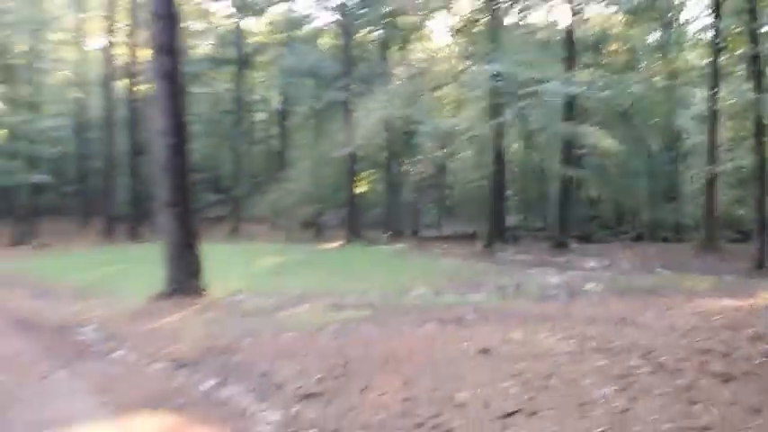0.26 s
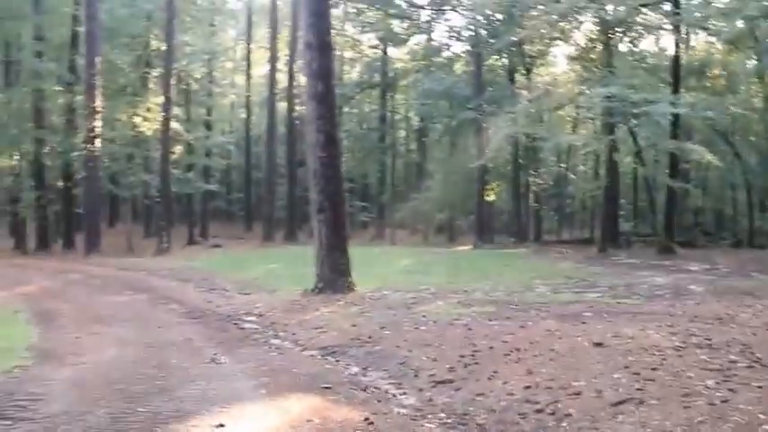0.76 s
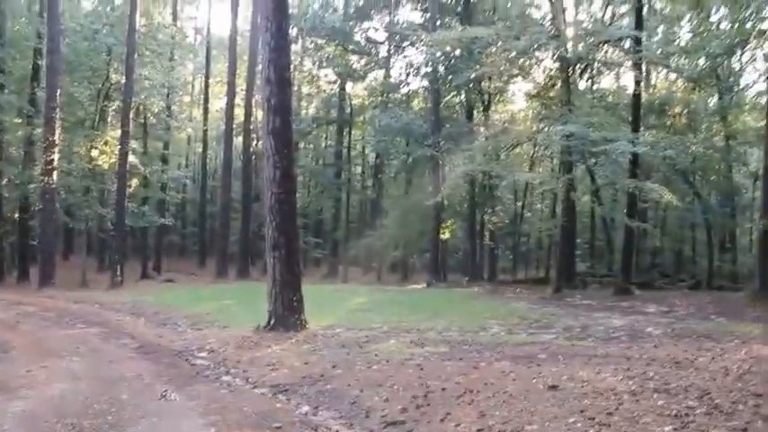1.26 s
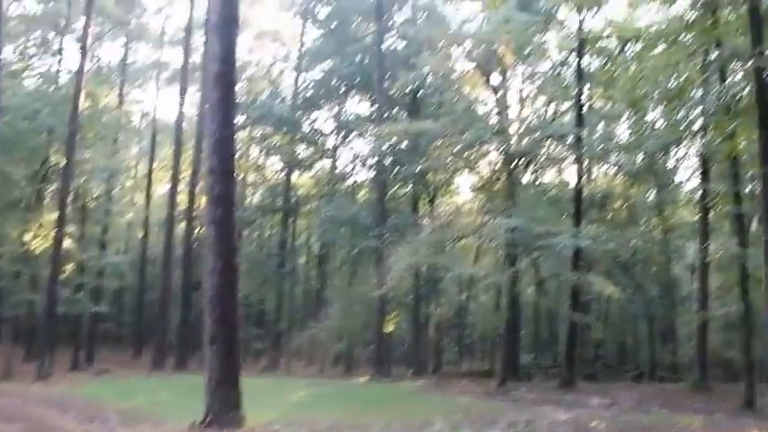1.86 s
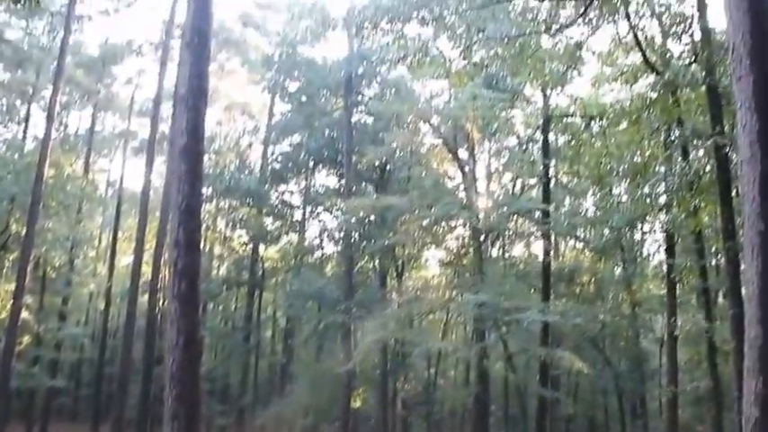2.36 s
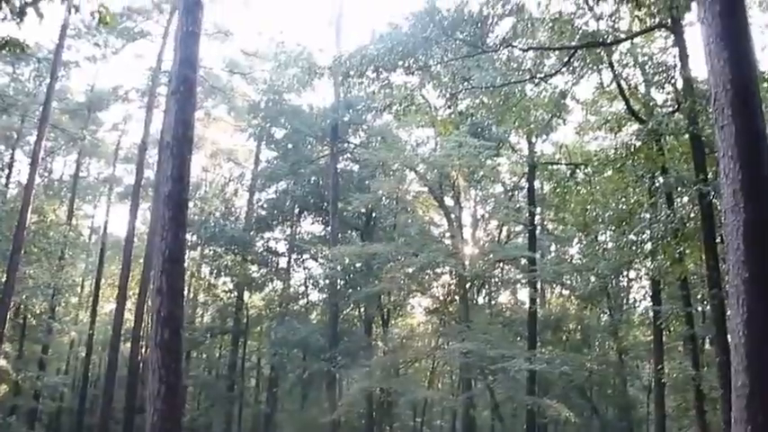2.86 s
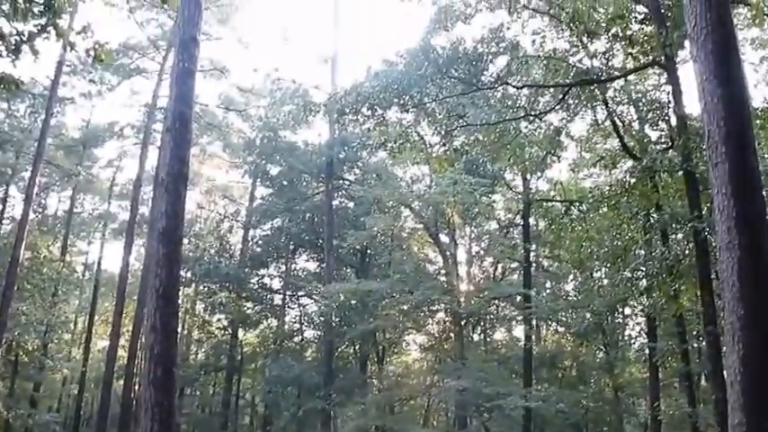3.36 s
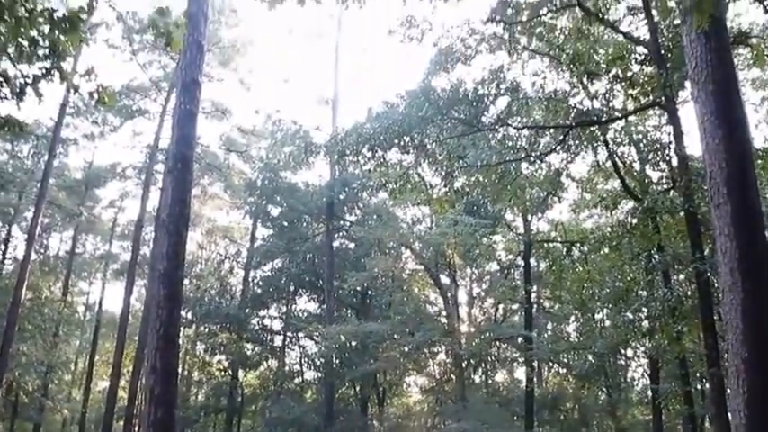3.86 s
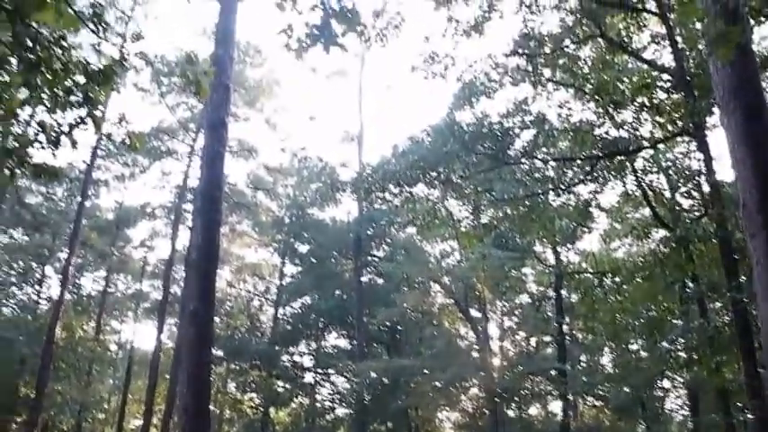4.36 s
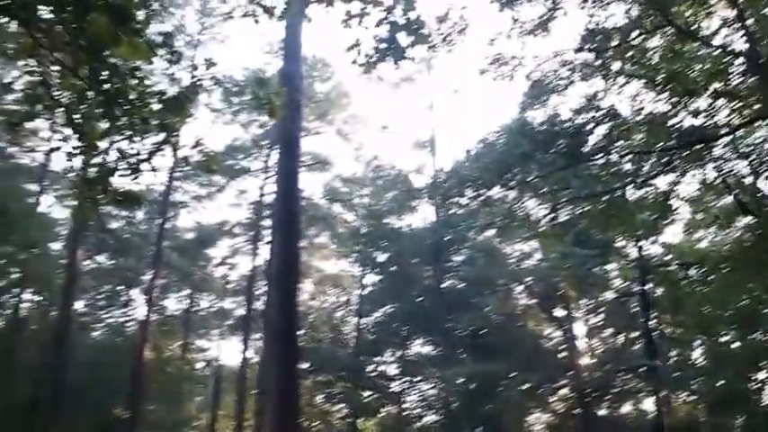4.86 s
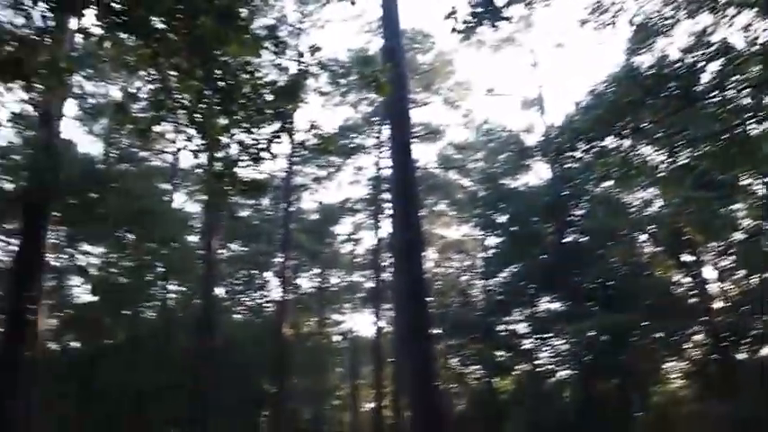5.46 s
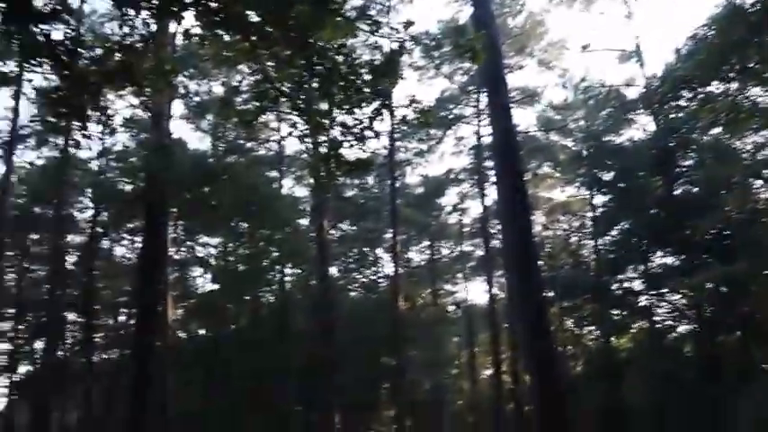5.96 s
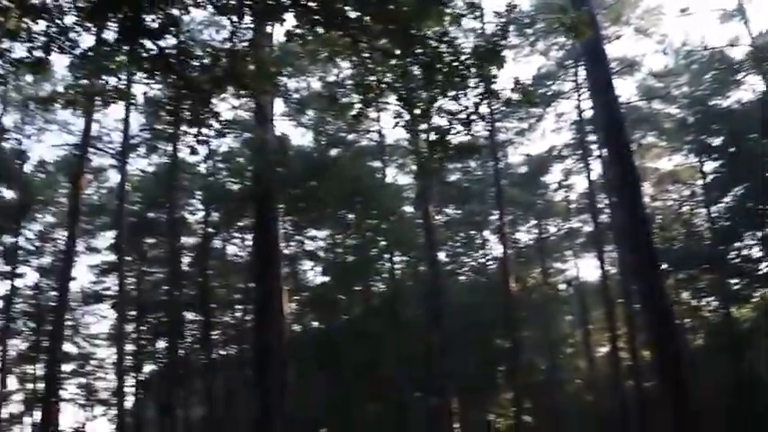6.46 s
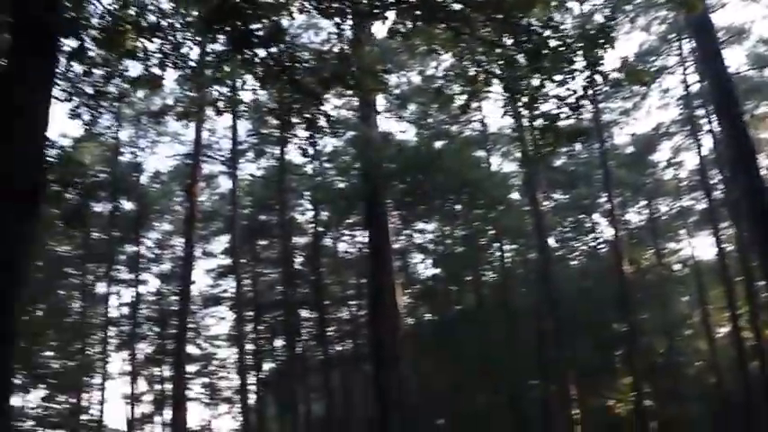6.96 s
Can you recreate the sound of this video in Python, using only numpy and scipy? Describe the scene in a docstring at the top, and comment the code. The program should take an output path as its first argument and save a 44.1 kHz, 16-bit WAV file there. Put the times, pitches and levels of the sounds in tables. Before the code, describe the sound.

A hand rubs and bumps the plastic case of a camera right at the microphone, with one hard knock at about 0.4 seconds and a cluster of sharp creaks and clicks through the first second. Separate small creaks, mostly quick double clicks, continue until about 2.4 seconds. In the lull, a light breeze briefly stirs leaves around 3 seconds, and a few faint high chips, from a small bird or insect, come between 3.5 and 4.1 seconds. The case clicks again at 4 seconds, followed by scattered, duller creaks and soft thuds. From about 6.7 seconds to the end, just past 7, the grip shifts with light rubbing and several padded bumps. The handling is much louder than the quiet wood behind it, where a low distant rumble, a faint wavering drone, soft foliage rustle and a thin high insect chorus carry on throughout.

```python
"""Plastic creaks close by: the housing of a hand-held camera, tilted up at the trees in a quiet wood.
Slips in the grip ring the case, mostly in pairs, the second usually sharper and weaker.
A hand rubs and knocks the case at first, and shifts again at the end. Behind are a low rumble with
a far drone, faint foliage, a thin insect chorus and a few high chips; a breeze stirs once."""
import sys
import numpy as np
from scipy.fft import rfft, irfft, next_fast_len
from scipy.io import wavfile
from scipy.ndimage import map_coordinates

SR = 44100
rng = np.random.default_rng(int(sys.argv[2]) if len(sys.argv) > 2 else 0)


def output_pcm(signal):
    """Save a mono or channel-first signal as 16-bit PCM at the path in sys.argv[1].

    Samples are clipped to [-1, 1] before scaling.
    """
    pcm = np.clip(np.atleast_2d(signal).T, -1, 1) * 32767
    wavfile.write(sys.argv[1], SR, np.round(pcm).astype(np.int16))


N = 318225
TIME = np.arange(N) / SR
HIT_SIZE = 4096  # samples per blow
HIT_HZ = np.fft.rfftfreq(HIT_SIZE, 1 / SR)


def creaks():
    """Each slip is a force pulse, rounded by its contact, that rings the case and shakes loose parts."""
    # Housing modes. Each row: frequency in Hz, width in Hz, gain in dB.
    case_modes = [(201, 169, 14), (361, 323, 14), (963, 120, 6.5), (1291, 97, 9), (1524, 111, 19.5),
                  (1680, 170, 10.5), (2349, 743, 13.5), (2463, 490, 15.5), (3385, 280, 3.5),
                  (3750, 2560, -1), (5680, 450, -1), (6400, 42, 1)]
    # Per mode: first pushes (1) or pulls (-1) the microphone.
    case_signs = [-1, 1, 1, 1, -1, 1, -1, 1, -1, 1, 1, 1]
    # Loose-part spectrum. Each row: frequency in Hz, gain in dB.
    rattle_colour = [(100, -6), (300, -1.5), (700, 5), (1100, 5.5), (1550, 2), (1900, 7), (2400, 6.5),
                     (3100, -1.5), (4500, -6.5), (6100, -6.5), (8000, -18), (16000, -30)]
    port_hz = 7040  # microphone port resonance
    port = 1 / (1 + .83j * HIT_HZ / port_hz - (HIT_HZ / port_hz) ** 2)
    damping = causal([(6800, 0), (8000, -3.5), (9500, -10.5), (16000, -3)])  # plastic absorbs treble
    rattle = causal(rattle_colour)
    track = np.zeros(N)
    for s, db, corner_hz in slips():
        contact = amp(db) / (1 + 1j * HIT_HZ / corner_hz) / (1 + 1j * HIT_HZ / (7 * corner_hz))
        ring = 0.31 + body(case_modes, case_signs, scatter_db=0.9)  # direct pulse plus modes
        add(track, s, contact * (port * damping * ring + rattle * shake(level_db=-7, t60_s=0.071)))
    return track


def slips():
    """Yield (s, dB, corner Hz) per slip; each weakens and moves the contact toward bare plastic."""
    # Runs of slips. Each row: start in seconds, first force in dB, first contact corner in Hz
    # (low: padded thud, high: sharp click), slip count, gap in seconds.
    runs = [(.2346, -10, 780, 1, 0), (.2503, -8.5, 950, 2, .0074), (.2939, -4.3, 950, 1, 0),
            (.3445, -7, 1600, 1, 0), (.3568, -9, 9000, 3, .005), (.3941, -6, 7500, 2, .0052),
            (.408, -5.5, 13000, 2, .009), (.523, -2, 450, 1, 0), (.5342, -6.5, 14000, 1, 0),
            (.6338, 8.5, 165, 1, 0), (.6413, -5.3, 8000, 2, .0116), (.6986, -6.8, 11000, 2, .0062),
            (.7756, -6.5, 8270, 2, .0077), (.795, -5.8, 4900, 2, .0142), (.9654, -4.5, 8000, 3, .01),
            (1.2134, 1, 2900, 2, .0124), (1.294, .3, 4500, 2, .0111), (1.3985, .2, 3500, 1, 0),
            (1.4875, .4, 2600, 2, .0115), (1.7353, 0, 1800, 2, .0103), (1.8814, -.8, 2300, 2, .0141),
            (1.9342, -.9, 1900, 2, .0123), (2.2762, -1.2, 3600, 2, .0108), (2.401, -4, 1940, 1, 0),
            (3.994, -.3, 4500, 2, .0101), (4.3871, .7, 950, 2, .0134), (4.7085, 4, 150, 1, 0),
            (4.8903, 3, 235, 2, .0151), (5.977, 1.5, 495, 2, .0122), (6.2864, 1.3, 180, 2, .0136),
            (6.7138, 2, 149, 1, 0), (6.804, 1.8, 185, 2, .0137), (6.88, -1, 150, 1, 0),
            (6.899, -1, 150, 1, 0), (7.0252, -.5, 150, 1, 0), (7.148, 2.3, 150, 1, 0),
            (7.2015, -5, 500, 2, .0094)]
    bare_hz, sharpen_share = 6500, .42
    slip_loss_db, loss_db_per_octave = 1, 3.4
    for s, db, corner_hz, count, gap_s in runs:
        for k in range(round(count)):
            yield s + k * gap_s, db, corner_hz
            octaves = sharpen_share * np.log2(bare_hz / corner_hz)
            corner_hz = corner_hz * 2 ** octaves
            db = db - slip_loss_db - loss_db_per_octave * max(octaves, 0)


def fingers():
    """Fingertips tick, pads bump and skin snaps free of the shell, which hardly rings."""
    # Tip and pad contacts. Each row: start in seconds, relative level in dB, count, gap in seconds.
    ticks = [(.0902, -30.5, 1, 0), (.7702, -24.5, 1, 0), (1.7047, -33.5, 1, 0), (1.9657, -31.5, 1, 0),
             (2.043, -38.5, 1, 0), (3.5858, -37.5, 1, 0), (5.1515, -29, 2, .0218), (6.3574, -35, 2, .02),
             (6.9625, -29.5, 3, .0133), (7.1076, -34, 1, 0), (7.1369, -28.5, 2, .0219)]
    bumps = [(.1434, -24.5, 1, 0), (.153, -22.5, 5, .0053), (.3248, -26, 1, 0), (.4293, -30.5, 1, 0),
             (.486, -32.5, 2, .0038)]
    # Their spectra. Each row: frequency in Hz, gain in dB.
    tick_colour = [(100, -51), (400, -14), (620, 3.5), (1100, 1.5), (1600, 2), (2100, -15), (3000, -21),
                   (6000, -26), (16000, -35)]
    bump_colour = [(60, -15), (250, -1.5), (520, 6.5), (780, 0.5), (1020, -5), (1400, 2), (1800, -21),
                   (3000, -33), (16000, -46)]
    # Skin releases. Each row: start in seconds, relative level in dB.
    snaps = [(.2352, -32), (.2936, -28), (.3239, -25.5), (.4846, -30), (.6335, -29)]
    tick, bump = causal(tick_colour), causal(bump_colour)
    snap = causal([(1000, -20), (3000, 3), (6000, -4), (8200, 2.5), (11000, -0.5), (16000, -9)])
    track = np.zeros(N)
    for s, db in stutter(ticks):
        add(track, s, -amp(db + 25.5) * tick * (1 + shake(level_db=-6, t60_s=0.024)))
    for s, db in stutter(bumps):
        add(track, s, -amp(db + 28) * bump * (1 + shake(level_db=-3, t60_s=0.021)))
    for s, db in snaps:
        add(track, s, amp(db + 6.5) * snap * (1 + shake(level_db=-7, t60_s=.012)))
    return track


def stutter(rows, loss_db=1.1):
    """Yield (s, dB) per contact of a stuttering finger: evenly spaced, fading."""
    for s, db, count, gap_s in rows:
        for k in range(round(count)):
            yield s + k * gap_s, db - k * loss_db


def knock(start_s=.4212):
    """One hard knock beside the microphone, dulled by the finger pad."""
    # Struck modes. Each row: frequency in Hz, width in Hz, gain in dB.
    modes = [(136, 210, 14), (860, 146, 31.8), (950, 384, 28.9), (1100, 580, 24.6), (1630, 720, 25.5),
             (1860, 74, 17), (2420, 250, 18.6), (2770, 110, 19.4), (3850, 2200, 1.2)]
    # Per mode: push (1) or pull (-1).
    signs = [1, 1, -1, 1, -1, -1, 1, 1, 1]
    pad = causal([(3000, 0), (5500, 0), (8000, -8), (16000, -12)])
    ring = body(modes, signs, scatter_db=0.7)
    track = np.zeros(N)
    add(track, start_s, amp(-1.3) * pad * ring * (1 + shake(level_db=-14, t60_s=0.05)))
    return track


def rubbing():
    """Sliding skin catches in tiny uneven slips that sound the case and add a fine fizz."""
    # Strokes. Each row: start in seconds, end in seconds, relative level in dB.
    strokes = [(.09, .288, -46.3), (.343, .418, -42), (6.78, 7.12, -59), (7.125, 7.22, -53.5)]
    # Rubbed-case spectrum. Each row: frequency in Hz, relative density in dB.
    scrape_colour = [(59, -34), (100, -21), (227, -5), (764, -10.5), (1490, -5), (1960, -13.5), (2420, -12),
                     (3180, -23), (3460, -15.5), (5040, -33), (6220, -41), (8000, -37.5), (15000, -41)]
    fizz_colour = [(1500, -29), (3000, -20), (5500, 13), (9000, -2), (16000, -12)]
    attack_s, release_s, catches_per_s = .016, .02, 1500
    level = np.zeros(N)
    for start_s, end_s, db in strokes:
        attack = np.clip((TIME - start_s) / attack_s, 0, 1)
        release = np.clip(1 - (TIME - end_s) / release_s, 0, 1)
        level += amp(db) * attack * release
    pressure = amp(1.5 * wobble(70))
    catches = (rng.random(N) < catches_per_s / SR) * rng.standard_normal(N)
    friction = unit(catches) + 0.55 * rng.standard_normal(N)
    scrape = unit(filtered(friction, lambda hz: gain(scrape_colour, hz)))
    fizz = unit(filtered(friction, lambda hz: gain(fizz_colour, hz)))
    return level * pressure * (amp(4.8) * scrape + amp(-17) * fizz)


def rumble():
    """Distant low noise, drifting in level."""
    # Rumble spectrum. Each row: frequency in Hz, relative density in dB.
    colour = [(20, -11), (55, -4.5), (100, -1), (135, 0.5), (200, -1), (260, -7), (400, -9), (700, -17),
              (1500, -37), (4000, -68)]
    # Slow drift. Each row: time in seconds, relative level in dB.
    drift = [(0.0, -51), (0.36, -48), (0.56, -50), (2.89, -54), (6.63, -51), (7.22, -49)]
    drift_db = np.interp(TIME, *np.transpose(drift))
    return amp(drift_db + 1.0 + 0.92 * wobble(5)) * noise(colour)


def foliage():
    """Faint, near-steady rustle of leaves."""
    # Leaf spectrum. Each row: frequency in Hz, relative density in dB.
    colour = [(150, -1), (500, 6), (1000, 2.5), (2500, -4), (3500, -8.5), (6000, -14.5), (9000, -23),
              (16000, -43)]
    return amp(-54.7 + 0.8 * wobble(5.6)) * noise(colour)


def drone(centre_hz=134, waver_hz=3.2):
    """A far-off tone wavering in pitch and level."""
    # Slow drift. Each row: time in seconds, relative level in dB.
    drift = [(0.0, -60), (1.24, -55), (1.69, -63), (1.95, -56), (2.75, -63), (5.26, -57), (5.53, -63),
             (5.83, -55), (7.22, -57)]
    drift_db = np.interp(TIME, *np.transpose(drift))
    pitch_hz = centre_hz + waver_hz * wobble(9)
    tone = np.sin(2 * np.pi * np.cumsum(pitch_hz) / SR)
    return amp(drift_db + 1.8 + 2.5 * wobble(7.8)) * tone


def swells():
    """Soft distant swells of low, narrow noise."""
    # Swells. Each row: crest time in seconds, level in dB, half length in seconds.
    crests = [(4.52, -53.5, .25), (5.7, -59, .35)]
    # Their spectrum. Each row: frequency in Hz, relative density in dB.
    colour = [(200, -33), (300, -2), (360, 0), (430, -7), (600, -38), (1500, -68)]
    return sum(crest(*row) for row in crests) * noise(colour)


def insects():
    """A thin chorus: high bands of flickering noise."""
    # Chorus spectrum. Each row: frequency in Hz, relative density in dB.
    colour = [(4000, -29), (5000, -13), (5250, -8), (5600, -19), (7000, -12), (7500, -5.5), (8050, -2),
              (8400, -5), (8900, -24), (11000, -54)]
    return amp(-64.5 + 0.98 * wobble(12)) * noise(colour)


def breeze():
    """One gust briefly stirs the leaves."""
    # Gust: crest time in seconds, level in dB, half length in seconds.
    gust = (2.98, -56, .23)
    leaves = noise([(200, -14), (400, 3), (900, -6), (1500, 0), (2500, -6.5), (3300, -15),
                    (5300, -9), (7000, -27), (16000, -45)])
    return crest(*gust) * amp(1.5 * wobble(11)) * leaves


def chips():
    """Short high chips of narrow noise, as of a small bird or insect."""
    # Calls. Each row: crest time in seconds, level in dB.
    calls = [(3.484, -53), (3.690, -56), (3.768, -55), (3.828, -53.5), (4.016, -48), (4.073, -49),
             (4.126, -47)]
    envelope = sum(crest(s, db, half_s=.0026) for s, db in calls)
    return envelope * noise([(4000, -45), (4950, -7), (5280, -2), (5600, -10), (6600, -45)])


def body(modes, signs, scatter_db):
    """Response of damped modes to one blow; strengths vary per blow."""
    total = 0
    for (hz, width_hz, db), sign in zip(modes, signs):
        resonance = 1j * HIT_HZ * width_hz / (hz ** 2 - HIT_HZ ** 2 + 1j * HIT_HZ * width_hz)
        total = total + sign * amp(db + scatter_db * rng.standard_normal()) * resonance
    return total


def shake(level_db, t60_s, rise_s=0.0013):
    """Response of a diffuse rattle that builds after a blow and dies away."""
    t = np.arange(HIT_SIZE) / SR
    tail = rng.standard_normal(HIT_SIZE) * amp(-60 * t / t60_s) * (1 - np.exp(-t / rise_s))
    return amp(level_db) * rfft(tail / np.linalg.norm(tail))


def causal(points):
    """Minimum-phase response through (Hz, dB) points: starts at once, then decays."""
    cepstrum = irfft(np.log(np.maximum(gain(points, HIT_HZ), 1e-6)))
    cepstrum[1:HIT_SIZE // 2] *= 2
    cepstrum[HIT_SIZE // 2 + 1:] = 0
    return np.exp(rfft(cepstrum))


def add(track, s, response):
    """Mix one blow, given as a spectrum, into the track at time s."""
    part = track[round(s * SR):][:HIT_SIZE]
    part += irfft(response)[:len(part)]


def amp(db):
    """Decibels to gain."""
    return 10 ** (np.asarray(db) / 20)


def unit(x):
    """x at rms 1."""
    return x / np.sqrt(np.mean(x ** 2) + 1e-20)


def gain(points, hz):
    """Gain of (Hz, dB) points joined on a log axis."""
    points_hz, db = np.transpose(points)
    return amp(np.interp(np.log(hz + 1), np.log(points_hz), db))


def wobble(knots_per_s):
    """A smooth random curve."""
    knots = rng.standard_normal(int(N * knots_per_s / SR) + 4)
    return map_coordinates(knots, [TIME * knots_per_s])


def crest(s, db, half_s):
    """Gaussian rise and fall around time s."""
    return amp(db) * np.exp(-((TIME - s) / half_s) ** 2)


def filtered(x, response):
    """x filtered by response(Hz)."""
    size = next_fast_len(N + 8192)
    return irfft(rfft(x, size) * response(np.fft.rfftfreq(size, 1 / SR)), size)[:N]


def noise(points):
    """Noise of rms 1, coloured by (Hz, dB) points."""
    return unit(filtered(rng.standard_normal(N), lambda hz: gain(points, hz)))


def scene():
    """Handling sounds over the quiet wood, mono."""
    handling = creaks() + fingers() + knock() + rubbing()
    wood = rumble() + foliage() + drone() + swells() + insects() + breeze() + chips()
    return (handling + wood)[None]


def record(dry):
    """The camera adds hiss and cuts everything above its band limit."""
    hiss_db, limit_hz = -59.5, 16100
    hiss = amp(hiss_db) * rng.standard_normal(N)
    return filtered(dry[0] + hiss, lambda hz: hz < limit_hz)[None]


dry = scene()
out = record(dry)
output_pcm(out)
```